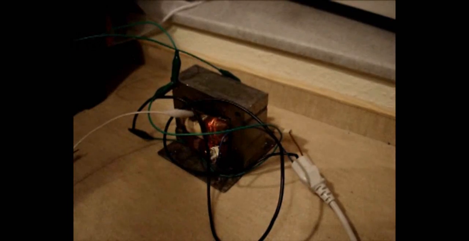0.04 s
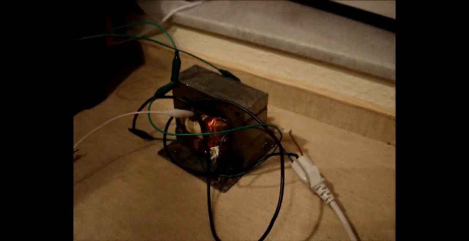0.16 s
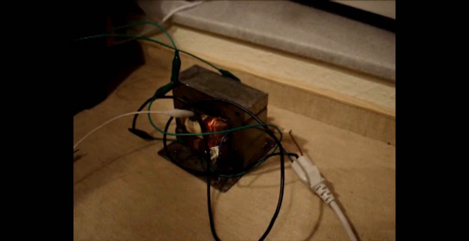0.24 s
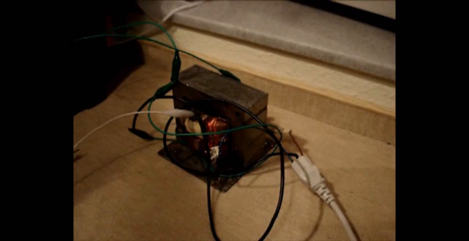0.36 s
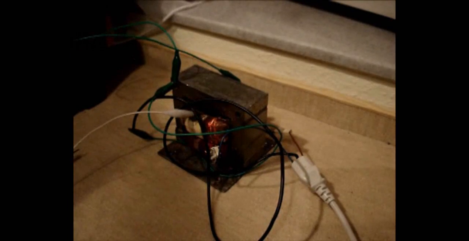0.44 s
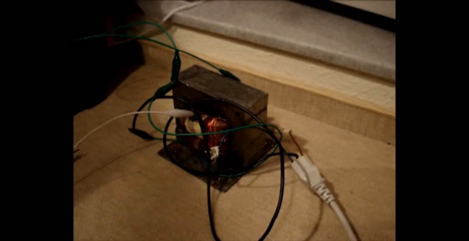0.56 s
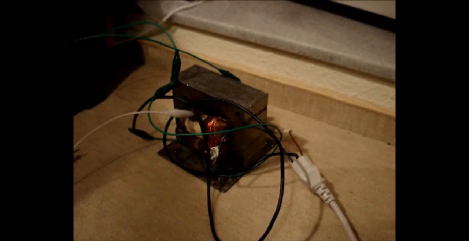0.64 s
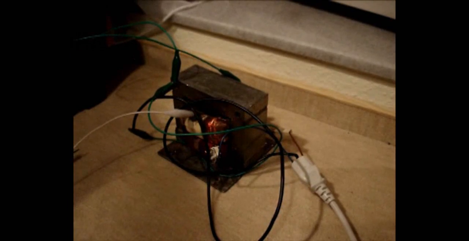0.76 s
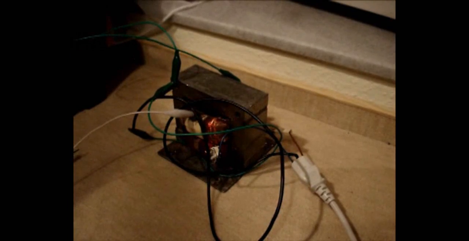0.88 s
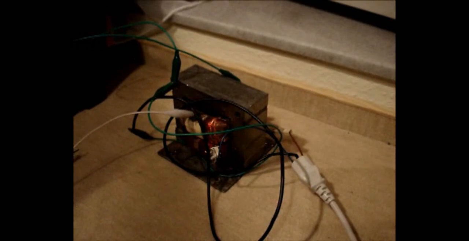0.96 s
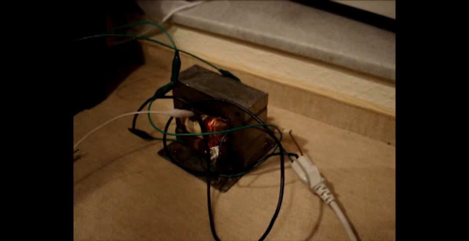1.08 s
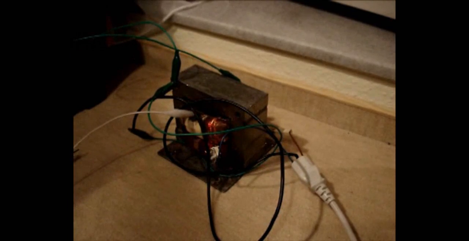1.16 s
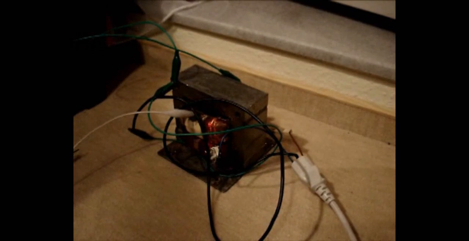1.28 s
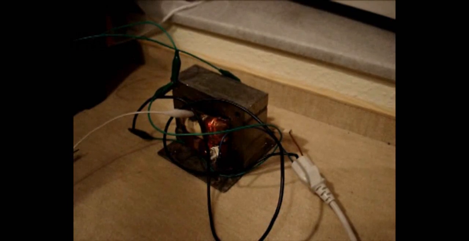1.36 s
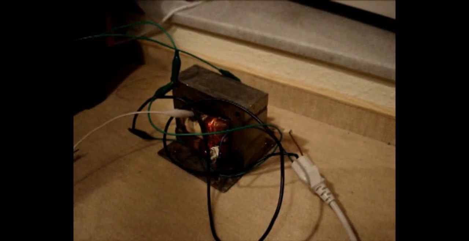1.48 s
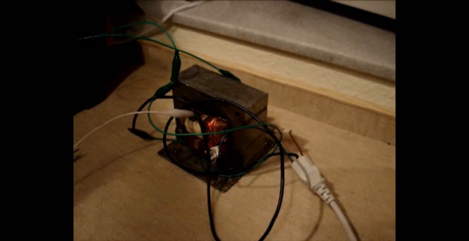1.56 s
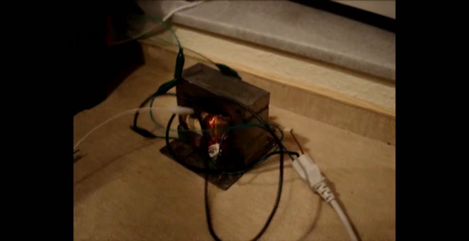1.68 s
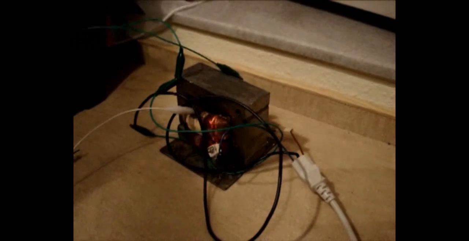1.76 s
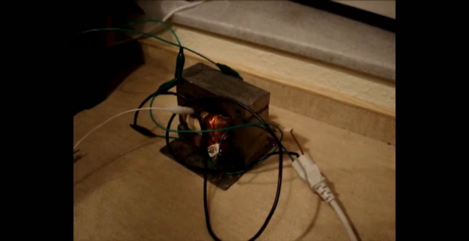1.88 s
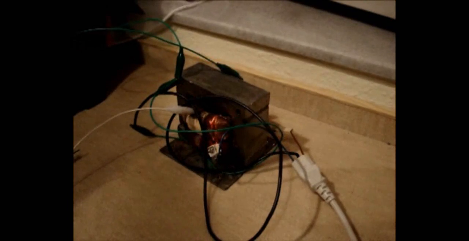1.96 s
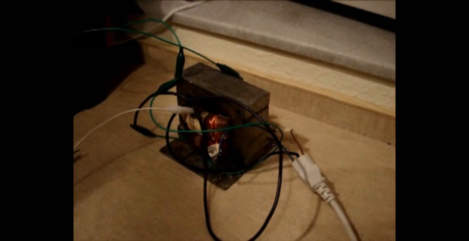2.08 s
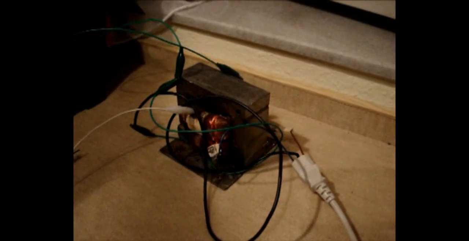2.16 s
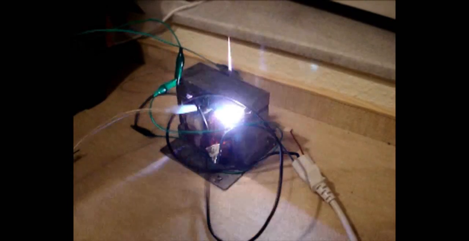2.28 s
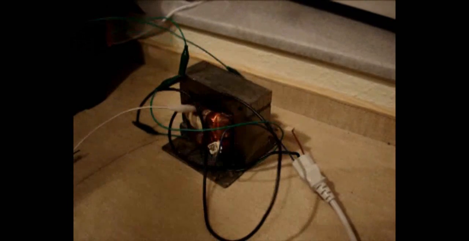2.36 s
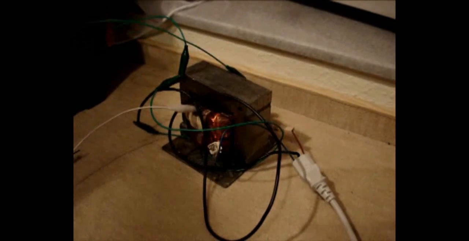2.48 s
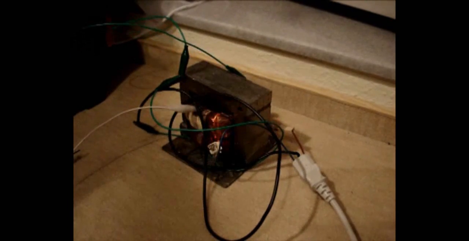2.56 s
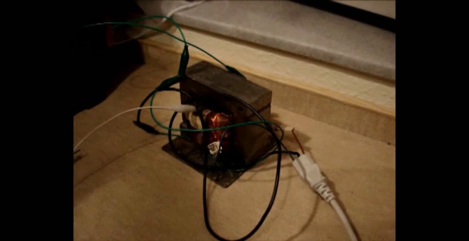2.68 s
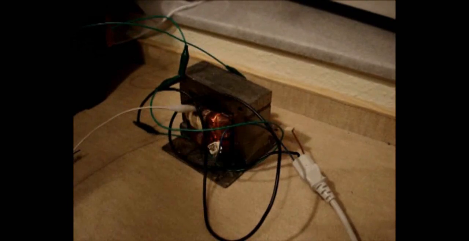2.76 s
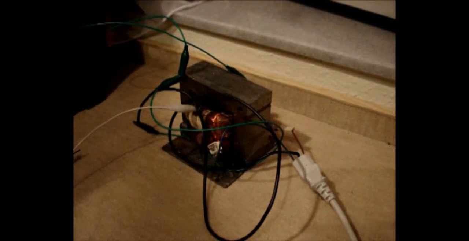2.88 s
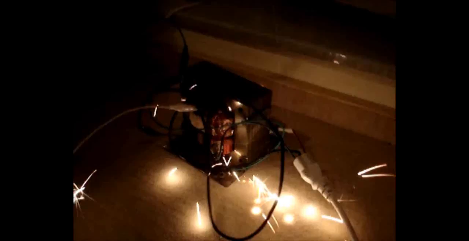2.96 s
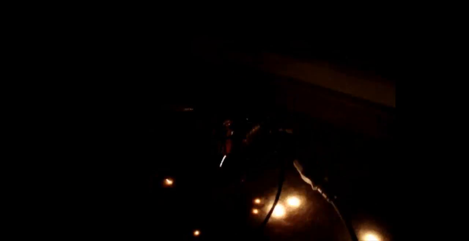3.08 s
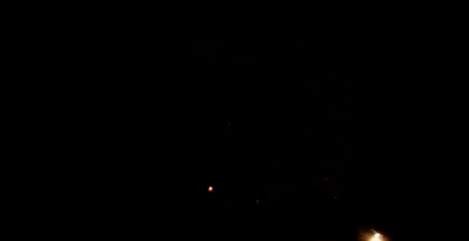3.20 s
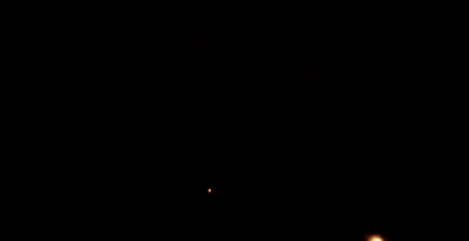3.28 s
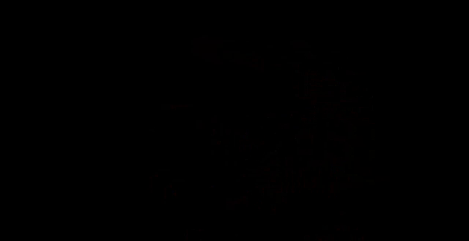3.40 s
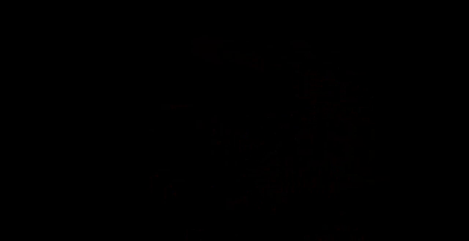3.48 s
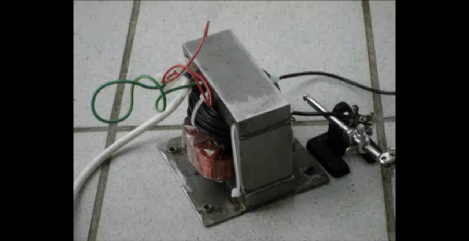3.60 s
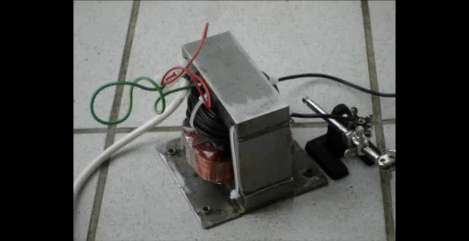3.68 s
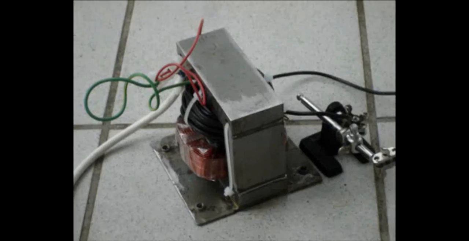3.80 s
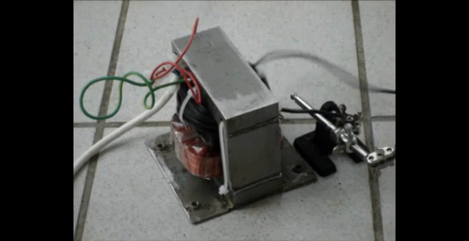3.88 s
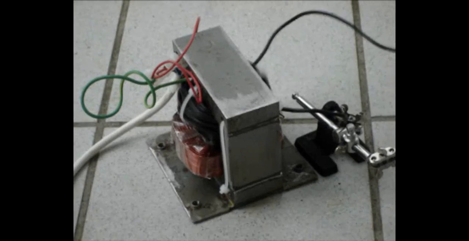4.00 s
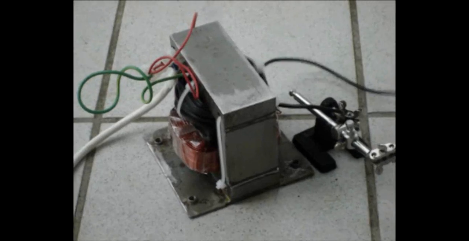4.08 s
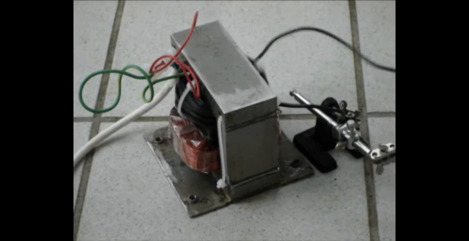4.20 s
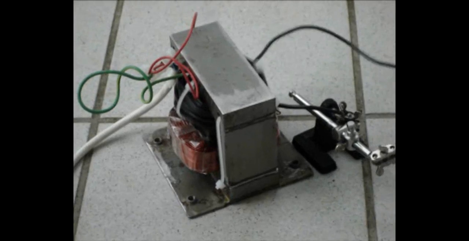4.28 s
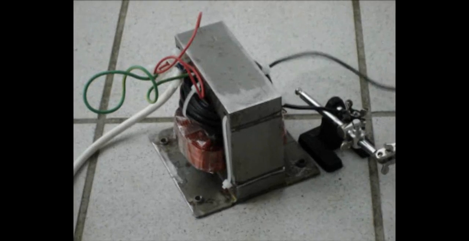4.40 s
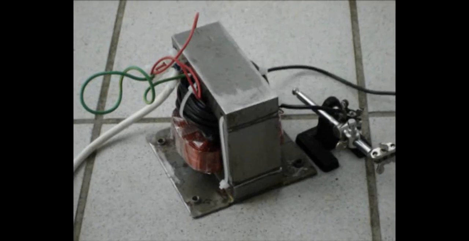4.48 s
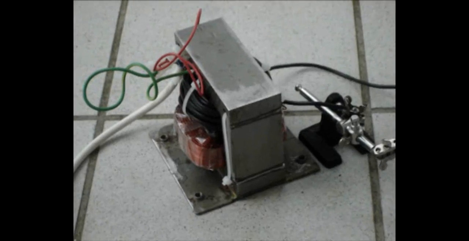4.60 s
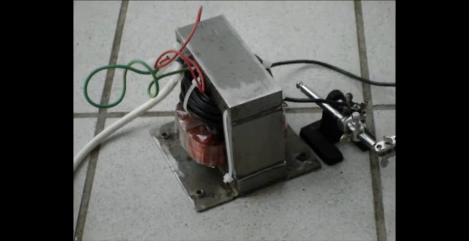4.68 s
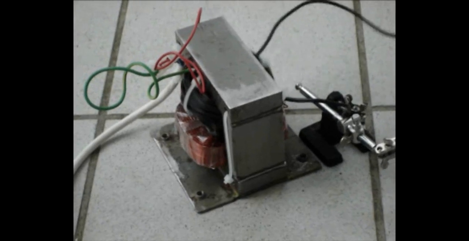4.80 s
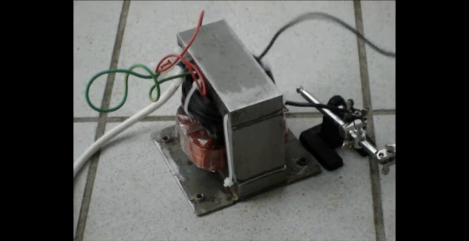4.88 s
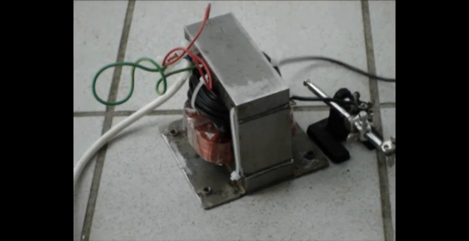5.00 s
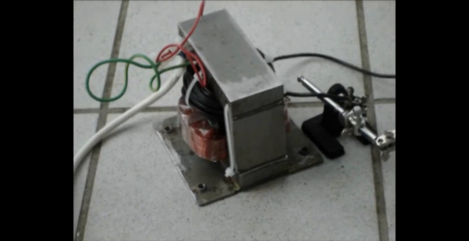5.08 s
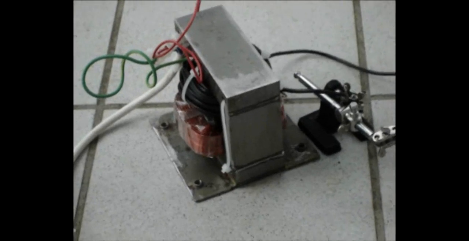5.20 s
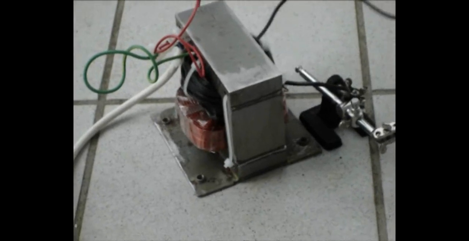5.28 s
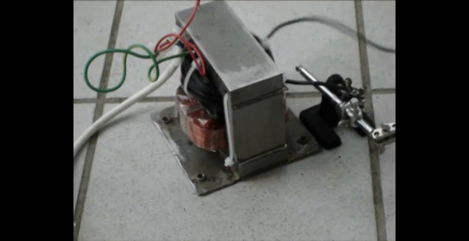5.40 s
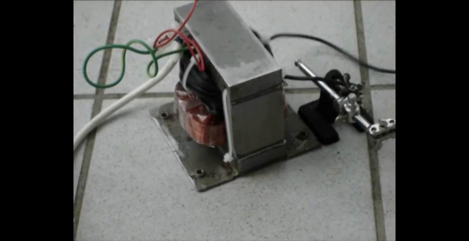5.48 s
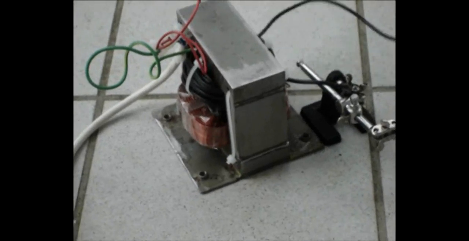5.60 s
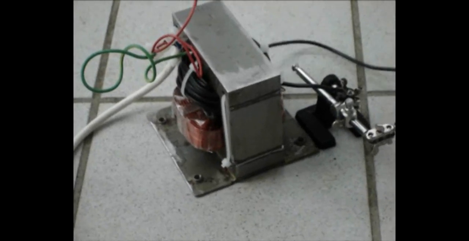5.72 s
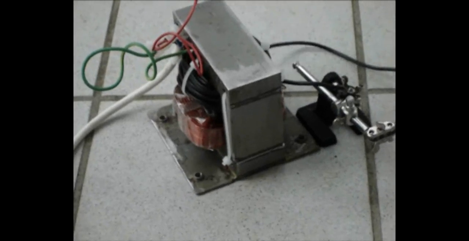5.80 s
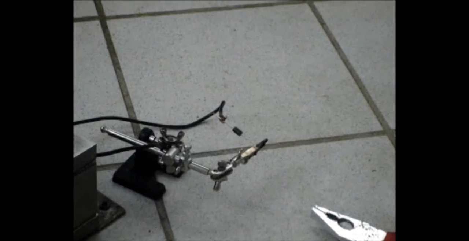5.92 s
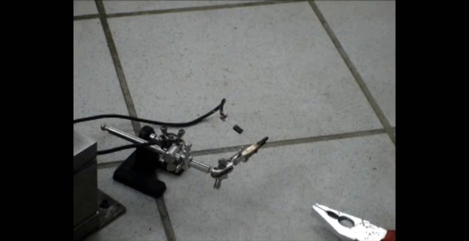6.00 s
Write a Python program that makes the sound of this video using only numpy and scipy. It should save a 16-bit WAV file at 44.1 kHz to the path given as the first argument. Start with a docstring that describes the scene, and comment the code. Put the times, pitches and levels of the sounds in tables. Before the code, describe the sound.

Over faint hiss and a very faint deep drone in a small room, hands fumble a plug from about 0.5 seconds, making irregular ticks, scrapes and hollow knocks with soft cable rustle. At 1.7 seconds a transformer shorts with a loud, clattering bang: rapid cracks, a brief metallic ring, a low thump and gritty spattering sparks. Similar bangs follow at 2.4 and 3.1 seconds, with more fumbling between and after. At 3.7 seconds the sound cuts to a tiled room with a low rumble and one light tap. A close switch clicks on and off three times, and the overloaded iron core buzzes from 4.1 to 4.5, 4.9 to 5.1 and 5.4 to 5.7 seconds. Each buzz rattles and sizzles with a thin wavering tone and a deep hum that lingers briefly. Near 6 seconds, a cut leaves quiet background noise and hiss.

```python
"""A small room, with a rewound mains transformer on the floor. Hands fumble a plug, and three times a short
flashes over: a clattering bang of cracks, ringing housing and molten spatter. Hard cut to a tiled room, where a
switch is closed three times: the overloaded iron core rattles and buzzes at twice the mains rate until the
switch clicks off. Cable rustle sits under the first room, with faint deep tones that glide up and down in
arches; a low murmur sits under the second, hiss under both; a last hard cut leaves low background noise and
hiss."""
import sys
import numpy as np
from scipy import signal
from scipy.fft import rfft, irfft, next_fast_len
from scipy.io import wavfile
from scipy.ndimage import uniform_filter1d

SR = 44100
rng = np.random.default_rng(int(sys.argv[2]) if len(sys.argv) > 2 else 0)


def store_wav(level_fs):
    """Save 16-bit WAV to argv[1]."""
    pcm = np.round(np.clip(np.atleast_2d(level_fs), -1, 1) * 32767)
    wavfile.write(sys.argv[1], SR, pcm.T.astype(np.int16))


N = 266805
T = np.arange(N) / SR

# Hits inside the bangs (time [s], level [dB], low ring send [dB], high ring send [dB])
BLOWS = [(1.727, 7.5, -15, -32), (1.733, 8, -24.5, -17.5), (1.739, -2.5, -2, -32.5), (1.755, 7, -23, -11),
         (1.769, -12, -19, -4.5), (1.798, 14.5, -18.5, -21), (1.817, -12, 7.5, -14), (1.828, -24.5, -17, 0),
         (2.407, 4, -13.5, -11.5), (2.413, -11.5, 1, -23.5), (2.429, 7, -24.5, -22),
         (2.441, 1.5, -6.5, -19), (2.46, -8, -13, -26), (2.498, -8.5, -0.5, -11), (3.056, 12, -18.5, -24),
         (3.069, -3.5, 4.5, -8), (3.077, -7, -30, -3.5)]
# Ring of the housing (pitch [Hz], send [0 low, 1 high], level [dB], t60 [s])
HOUSING_MODES = [(890, 0, -5.5, 0.021), (1040, 0, -9.5, 0.029), (2120, 1, -5, 0.056),
                 (2500, 1, -20.5, 0.074)]
# Arc strikes (time [s], burn [s], arc level [dB], treble re arc [dB], spark level [dB],
# spark fade [dB/s], shaken cable level [dB], thump level [dB])
ARCS = [(1.728, 0.011, -15, -6, -31.5, 223, -47, 2.5), (1.756, 0.021, -24, -3.5, -37.5, 230, -57.5, -0.5),
        (1.798, 0.0046, -34, -21, -30, 221, -53.5, 0.5), (2.405, 0.0019, -15.5, -8, -25, 260, -49.5, 5),
        (2.427, 0.027, -25.5, 0, -27.5, 260, -51, -1.5), (2.495, 0.012, -35.5, -27, -42, 302, -57, -4.5),
        (3.057, 0.021, -20.5, -5.5, -23.5, 183, -58, 1.5)]
# Boom of floor and room (pitch [Hz], level [dB], t60 [s])
THUMP_MODES = [(38.9, -25, 0.022), (68.2, -47, 0.3), (102.6, -40, 0.23)]
# Held notes of the housing (time [s], length [s], HOUSING_MODES row [index, rounded], level [dB])
HOUSING_NOTES = [(1.746, 0.061, 0, -20), (1.757, 0.038, 2, -19.5), (1.7992, 0.0037, 1.5, -5),
                 (1.809, 0.033, 0.5, -18.5), (1.814, 0.029, 3, -23.5), (2.406, .018, 0.5, -5),
                 (2.454, 0.03, 1, -24), (2.462, 0.031, 2, -21.5), (2.5, 0.0074, 0.5, -14.5),
                 (3.062, 0.012, 0, -4.5), (3.075, .05, 0.5, -25)]
# Switch throws (on [s], off [s], on click [dB], off click [dB], rattle level [dB], attack [s])
SWITCHINGS = [(4.0578, 4.542, -15, -13.5, -10, 0.022), (4.8982, 5.11, -12, -10, -12, 0.0083),
              (5.3931, 5.7428, -12.5, -15, -9, 0.027)]
# Swells under load (time [s], rattle boost [dB], sizzle boost [dB], extra sizzle treble [dB])
SURGES = [(4.1, 1.5, 0, 2.5), (4.128, 3.5, 3.5, 9), (4.2, 3, 7.5, 4), (4.34, 1, 2, 4.5),
          (4.398, -2.5, 7, 6), (4.479, -2, 3.5, 2.5), (4.522, -7.5, 4, 6), (4.934, 5, 5.5, 7.5),
          (5.028, -1.5, 3.5, 4), (5.09, 2, 1.5, -3), (5.487, -0.5, 4.5, 7.5), (5.506, 0, -5, -9),
          (5.576, -3, 2, 8.5), (5.599, -5.5, 5, 0), (5.652, -3.5, 4.5, 3.5)]
# Resonances of the iron core (pitch [Hz], width [Hz], level [dB])
CORE_MODES = [(169, 4, -9), (196, 7.8, -11), (293, 6, -19.5), (288.3, 8.8, -8.5), (389, 26, 3),
              (474, 5.6, 3), (527.7, 36, -2.5), (709, 11, -2.5), (740.4, 14.8, -2), (891, 98, -20.5),
              (1022, 78, -9.5), (1203, 22, -7.5), (1286, 98, -13)]
# EQ of the chattering laminations (frequency [Hz], level [dB])
RATTLE_EQ = [(60, -52), (110, -44), (200, -49), (400, -6.5), (600, -2.5), (1000, -6), (1450, -22),
             (2000, -37.5), (3500, -100)]
# EQ of the contact sizzle (frequency [Hz], level [dB])
SIZZLE_EQ = [(760, -11.5), (1300, -14.5), (1480, -14.5), (1700, 1), (1830, -3), (2480, -7), (3290, -5),
             (3810, -12), (4110, -10), (4520, -14.5), (7250, -24.5), (8910, -28), (10100, -49),
             (13200, -79), (22000, -120)]
# Path of the loose plate's tone (time [s], pitch [Hz], level [dB])
PLATE_PATH = [(4.075, 573.5, -9.5), (4.107, 577.1, -1), (4.19, 545.7, -9), (4.238, 567, -6),
              (4.3, 548.7, -4), (4.389, 537, -7), (4.454, 566, -2.5), (4.56, 567.5, -1), (4.919, 534.6, -7),
              (4.994, 543.6, 3.5), (5.015, 541, -15), (5.048, 570, -7), (5.12, 545, -2),
              (5.42, 581.6, -4.5), (5.527, 569, -4.5), (5.6, 555, -8), (5.648, 534, -3), (5.708, 593, -9),
              (5.76, 538.6, -1)]
# Hum partials (pitch [multiple of PULL_HZ], level [dB], t60 in the room [s])
HUM_PARTIALS = [(1, -39.5, 0.43), (1.5, -38.5, 0.97), (2, -25, 0.36), (3, -31.5, 0.41)]
# Ring of the plastic switch (pitch [Hz], level [dB], t60 [s])
CLICK_MODES = [(1335, 1, 0.006), (3120, 6, 0.002), (4860, 5.5, 0.005), (6360, -5.5, 0.0079),
               (7840, -15, 0.015)]
# Plug touches (time [s], level [dB], tick pitch [Hz], knock trim [dB], treble trim [dB], scrape [dB])
TAPS = [(0.549, -47, 1170, 7, -23, -3), (0.994, -23, 1020, -6.5, -32, -5.5),
        (1.182, -59, 1350, 20, -22, -8), (1.21, -16.5, 1490, -14, -32, -5),
        (1.244, -32.5, 1690, -1, -28, -10), (1.303, -48, 1720, 6, -21, -5),
        (1.377, -32.5, 2700, -3, -23, -4), (1.412, -16, 880, -6.5, -27, -0.5),
        (1.428, -21, 1070, -12, -26, -11), (1.651, -33.5, 1050, 5.5, -19, -12),
        (1.684, -18.5, 1750, -5, -7.5, 2), (1.959, -19, 1150, -23, -32, -12.5),
        (2.119, -22, 1730, -17, -7, -12), (2.193, -31.5, 930, -1, -9.5, 1.5), (2.28, -50, 940, 8, -24, -8),
        (2.356, -27.5, 2350, -9, -8, -2), (2.368, -20.5, 1750, -7.5, -10, 2.5),
        (2.626, -33, 1460, -12.5, -2.5, -6.5), (2.742, -36.5, 1400, -13, -5, -8),
        (2.768, -29.5, 1790, -15, -5, -5.5), (2.814, -43.5, 1350, 4, -17, -4),
        (2.881, -31, 1140, -10, -3.5, -3.5), (2.911, -36.5, 1650, -5, -2.5, -0.5),
        (2.999, -19, 1600, -22.5, -13.5, -1.5), (3.021, -30, 1790, -17, -0.5, 0.5),
        (3.238, -31.5, 1940, -37, -6.5, 0.5), (3.449, -39.5, 1710, -31.5, 8, -1.5),
        (3.46, -29, 1720, -5.5, 7, -13), (3.519, -37, 2800, -4, -13.5, -4),
        (3.634, -40.5, 1800, -35, -2, -2.5), (3.839, -20, 2600, -12.5, -8, -12)]
# Ring of the plug's shell (pitch [Hz], level [dB], t60 [s])
SHELL_MODES = [(1076, -7.5, 0.043), (1584, 3, 0.022), (1717, -3.5, 0.078), (2735, -1.5, 0.039),
               (3040, 2.5, 0.022)]
# Hollow knock of the housing (pitch [Hz], level [dB], t60 [s])
KNOCK_MODES = [(357.5, -3, 0.066), (492, -11, 0.084)]
# EQ of the low noise: cable rustle first, plain background at the end (frequency [Hz], level [dB])
LOW_NOISE_EQ = [(59, -31), (100, -8.5), (452, 8.5), (647, 0), (1220, -6.5), (1330, -6.5), (1900, -5.5),
                (3710, -10.5), (6000, -20.5), (7800, -45.5), (13200, -120)]
# Fader ride of the low noise (time [s], level [dB])
LOW_NOISE_RIDE = [(0, -93), (.5, -63), (1, -57.5), (1.6, -53), (2.1, -63.5), (2.35, -54), (2.7, -72),
                  (3, -51), (3.35, -74.5), (3.7, -64), (6.05, -53.5)]
# EQ of the tiled room's murmur (frequency [Hz], level [dB])
MURMUR_EQ = [(45, -31), (65, -8), (80, 10), (100, -5), (230, -3), (420, -4), (730, -5), (1270, -11.5),
             (1900, -14), (4000, -19.5), (8000, -27), (10400, -45)]
# Up-and-down glides of the drone (start [s], length [s], top pitch [Hz])
DRONE_ARCHES = [(-.15, 1.22, 38), (1.45, 1.0, 41), (2.38, 1.25, 40), (3.13, 1.1, 38)]
# EQ of the hiss bed (frequency [Hz], level [dB])
HISS_EQ = [(20, -7.5), (53, -5.5), (90, -1.5), (128, -5), (776, -8.5), (984, -7.5), (1070, -8.5),
           (3220, -14), (3490, -11.5), (10100, -18.5), (13200, -40.5), (22000, -120)]
# Fader ride of the hiss (time [s], level [dB])
HISS_RIDE = [(0, -61), (1.4, -56), (2.7, -60.5), (3.7, -60), (5.9, -56), (6, -57)]

TILED_IN_S, TILED_OUT_S = 3.73, 5.958
PULL_HZ = 99.77  # the core is pulled tight twice per mains cycle
MAKE_S, BREAK_S = 0.0047, 0.016  # lag from click to current on, and to current off
RISE_S = 0.00138  # lag from the cue of a touch or blow to its transient


def flashovers():
    """The bangs: sharp pressure cracks ring the housing, over a low thump and the spatter."""
    s, db, low_db, high_db = np.transpose(BLOWS)
    s = s + RISE_S
    hit = strikes(s, undb(db))
    pressure = hit - np.roll(hit, shift=18)  # a push, then suction
    crack = undb(5) * band(band(pressure, 500, 2400), 300, 7900)
    kick = strikes([row[0] for row in ARCS], undb([row[-1] for row in ARCS]))
    sends = strikes(s, undb(db + low_db)), strikes(s, undb(db + high_db))
    housing = sum(undb(g) * ring(sends[round(k)], hz, t60) for hz, k, g, t60 in HOUSING_MODES)
    return crack + resonate(kick, THUMP_MODES) + housing + spatter()


def spatter():
    """Molten metal: a gritty burst while each arc burns, then a longer tail of falling sparks."""
    grain = rng.standard_normal(N) * undb(3.3 * walk(300))
    body = unit(band(band(grain, 670, 4030), 1200, 4300)) + undb(-12) * unit(band(grain, 220, 1100))
    treble = unit(band(band(grain, 4500, 8500), 4200, 9500))
    out = 0
    for s, burn_s, db, treble_db, sparks_db, fade_db_s, *_ in ARCS:
        arc = fade(s, burn_s, db, fade_db_s=500)
        sparks = fade(s, burn_s, sparks_db, fade_db_s)
        out += (arc + sparks) * body + (undb(treble_db) * arc + undb(-12.5) * sparks) * treble
    return out


def housing_song():
    """The housing sings while the arc drives it: rough tones that swell fast, hold and stop dead."""
    out = np.zeros(N)
    for s, span, row, db in HOUSING_NOTES:
        t, i = T[:int(span * SR)], int(s * SR)
        envelope = undb(db) * np.sin(np.pi * t / span) ** 0.18
        out[i:i + len(t)] += envelope * np.sin(2 * np.pi * HOUSING_MODES[round(row)][0] * t)
    return out * undb(1.8 * walk(250))


def core_buzz():
    """Loose laminations slap unevenly on every magnetic pull and ring the core; sizzle rides on top."""
    count = int(N / SR * PULL_HZ)
    jitter, force = rng.standard_normal((count, 2)).T
    slaps = strikes(np.abs(np.arange(count) + 0.049 * jitter) / PULL_HZ, undb(3.5 * force))
    pull = np.cos(2 * np.pi * PULL_HZ * T)
    envelope = core_load() * undb(1.85 * walk(30))
    grit = rng.standard_normal(N) * (1 + 0.079 * pull)
    chatter = envelope * (0.93 * unit(slaps) + grit)
    iron = sum(undb(db) * unit(ring(chatter, hz, 2.1 / width)) * np.sqrt(width / 30)
               for hz, width, db in CORE_MODES)
    rattle = undb(-23) * unit(iron) + undb(-25.5) * colour(chatter, RATTLE_EQ)
    return band(band(rattle, 115, 6000), 118, 7000) + undb(-21) * contact_sizzle(pull)


def contact_sizzle(pull):
    """A fizz that pulses with the pull while current flows; its top end spits with the surges."""
    fizz = colour(rng.standard_normal(N), SIZZLE_EQ) * (1 + 0.16 * pull) * undb(2.1 * walk(110))
    treble = band(band(fizz, 4400, 10000), 4400, 10000)
    spit = undb(-15.5) * surges(column=3)
    return current() * surges(column=2) * (unit(fizz - treble) + spit * unit(treble))


def current(start_db=-10.5):
    """Gate that passes sound while the switch is closed, building up from a soft start."""
    out = np.zeros(N)
    for on, off, *_, attack_s in SWITCHINGS:
        i, j = int((on + MAKE_S) * SR), int((off + BREAK_S) * SR)
        out[i:j] = undb(start_db * np.clip(1 - T[:j - i] / attack_s, 0, 1))
    return out


def core_load(sag_db_s=4):
    """Envelope of the rattle: it follows the current, surges, and sags under load."""
    on, _, _, _, db, _ = np.transpose(SWITCHINGS)
    throw = np.maximum(np.searchsorted(on, T) - 1, 0)
    return current() * surges(column=1) * undb(db[throw] - sag_db_s * np.maximum(T - on[throw], 0))


def surges(column, width_s=0.014):
    """Gain from one column of SURGES, each entry a short, smooth swell or dip."""
    rows = np.array(SURGES)
    bump = np.exp(-(np.arange(-SR // 20, SR // 20) / SR / width_s) ** 2)
    return undb(signal.fftconvolve(strikes(rows[:, 0], rows[:, column]), bump, "same"))


def loose_plate():
    """A loose plate flutters on a thin tone whose pitch wanders as the core heats and shifts."""
    s, hz, db = np.transpose(PLATE_PATH)
    phase = 2 * np.pi * np.cumsum(np.interp(T, s, hz) + 5.074 * walk(60)) / SR
    flutter = undb(2.5 * walk(40))
    return undb(np.interp(T, s, db)) * uniform_filter1d(core_load(), size=300) * flutter * np.sin(phase)


def hum(attack_s=0.023):
    """The clean pull of the core fills room modes, which boom on after the switch opens."""
    out = 0
    for multiple, db, t60 in HUM_PARTIALS:
        swell = 0
        for on, off, *_ in SWITCHINGS:
            release = undb(-60 * np.maximum(T - off - BREAK_S, 0) / t60)
            swell += np.clip((T - on - MAKE_S) / attack_s, 0, 1) * release
        out += undb(db + 5.1 * walk(33)) * swell * np.sin(2 * np.pi * multiple * PULL_HZ * T)
    return np.sqrt(2) * out


def switch_clicks():
    """Contacts scrape and bounce for a few milliseconds and ring the plastic switch."""
    s, db = np.transpose(SWITCHINGS)[:4].reshape(2, -1)  # on and off clicks together
    age = T[:SR // 30] / 0.0015
    envelope = signal.fftconvolve(strikes(s, undb(db - 7.5)), age ** 2 * np.exp(-1.5 * age))[:N]
    bounce = envelope * rng.standard_normal(N)
    return resonate(bounce, CLICK_MODES) + undb(2) * band(bounce, 720, 6300)


def plug_fumble(tick_t60=0.0059, scrape_t60=0.14):
    """Each touch: a tick with a scraping tail, the shell modes nearest its pitch, then a hollow knock."""
    ticks, t = np.zeros(N), T[:SR // 4]
    for s, db, hz, _, treble_db, scrape_db in TAPS:
        noise = rng.standard_normal(len(t))
        body = unit(band(band(noise, 0.42 * hz, 3.14 * hz), 0.38 * hz, 1.3 * hz))
        treble = undb(treble_db) * unit(band(band(noise, 4800, 8000), 2700, 8000))
        envelope = undb(-60 * t / tick_t60) + undb(scrape_db - 60 * t / scrape_t60)
        i = int((s + RISE_S) * SR)
        ticks[i:i + len(t)] += undb(db - 14) * (body + treble) * envelope
    s, db, tick_hz, knock_db, *_ = np.transpose(TAPS)
    shell = 0
    for hz, mode_db, t60 in SHELL_MODES:
        octaves_off = np.abs(np.log2(hz / tick_hz))
        shell += ring(strikes(s + RISE_S, undb(db + mode_db - 13 - 7.9 * octaves_off)), hz, t60)
    push = uniform_filter1d(strikes(s + 0.0057, undb(db + knock_db)), size=45)  # a soft contact
    return ticks + band(shell, 610, 4800) + band(resonate(push, KNOCK_MODES), 160, 3000)


def low_noise():
    """In the small room, cables moved by hand and jolted by each arc; at the end, plain background."""
    jolts = sum(fade(s, 0, db, fade_db_s=80) for s, *_, db, _ in ARCS)
    return noise_bed(LOW_NOISE_EQ, flicker_db=3, rate_hz=40) * (ride(LOW_NOISE_RIDE) + jolts)


def drone():
    """A faint deep tone and its octave glide in arches, over a sway too deep to have a pitch."""
    hz = np.zeros(N)
    for s, span, top_hz in DRONE_ARCHES:  # each arch takes over from the one before
        hz = np.where(T > s, top_hz * np.sin(np.pi * np.clip((T - s) / span, 0, 1)), hz)
    phase = 2 * np.pi * np.cumsum(hz) / SR
    sway = undb(-52.5) * walk(12) * np.sqrt(np.maximum(hz, 0) / hz.max())
    return undb(-65.5) * np.sqrt(2) * (np.sin(phase) + undb(-5) * np.sin(2 * phase)) + sway


def noise_bed(eq, flicker_db, rate_hz):
    """Coloured noise whose level wanders."""
    return colour(rng.standard_normal(N), eq) * undb(flicker_db * walk(rate_hz))


def room(x, wet_db, low_t60, high_t60, build_s):
    """Direct sound plus a diffuse tail whose treble dies at its own pace."""
    t, noise = T[:SR], rng.standard_normal(SR)
    low = signal.lfilter(*signal.butter(1, 1000, fs=SR), noise)
    tail = low * undb(-60 * t / low_t60) + (noise - low) * undb(-60 * t / high_t60)
    tail *= 1 - np.exp(-t / build_s)
    return x + undb(wet_db) * signal.fftconvolve(x, tail / np.linalg.norm(tail))[:N]


def undb(db):
    return 10 ** (np.asarray(db) / 20)


def unit(x):
    return x / np.sqrt(np.mean(x ** 2))


def band(x, lo_hz, hi_hz):
    return signal.sosfilt(signal.butter(2, [lo_hz, hi_hz], "band", fs=SR, output="sos"), x)


def colour(x, eq):
    """Shape x with an EQ curve, at unit RMS."""
    hz, db = np.transpose(eq)
    size = next_fast_len(len(x))
    bins_hz = np.maximum(np.arange(size // 2 + 1) * SR / size, 1)
    gain = undb(np.interp(np.log(bins_hz), np.log(hz), db))
    return unit(irfft(rfft(x, size) * gain, size)[:len(x)])


def ring(x, hz, t60):
    """One mode; a unit impulse rings with amplitude 1."""
    pole = np.exp(2j * np.pi * hz / SR - np.log(1000) / (max(t60, 1e-3) * SR))
    return signal.lfilter([1], [1, -pole], x).imag


def resonate(x, modes):
    """Play x through a bank of modes."""
    return sum(undb(db) * ring(x, hz, t60) for hz, db, t60 in modes)


def walk(rate_hz):
    """Glides between random levels; spread near 1."""
    step = int(SR / rate_hz)
    return uniform_filter1d(np.repeat(rng.standard_normal(N // step + 1), step), step)[:N]


def strikes(s, gain):
    """Impulses of the given sizes at times s."""
    x = np.zeros(N)
    np.add.at(x, (np.asarray(s) * SR).astype(int), gain)
    return x


def fade(s, hold_s, db, fade_db_s):
    """Envelope that starts at s, holds, then falls at a steady rate."""
    out, i = np.zeros(N), int(s * SR)
    out[i:i + SR] = undb(db - fade_db_s * np.maximum(T[:SR] - hold_s, 0))
    return out


def ride(points):
    """Gain that follows a fader ride."""
    return undb(np.interp(T, *np.transpose(points)))


def scene():
    """Bangs in the small room, hard cut to the buzz in the tiled room, hiss throughout."""
    plug = plug_fumble()
    song, plate = housing_song(), loose_plate()  # narrow tones stir few room modes, so they stay drier
    small = plug + flashovers() + 0.59 * song
    small = room(small, wet_db=-12.5, low_t60=0.31, high_t60=0.13, build_s=0.016)
    small += 0.22 * song + drone()
    clicks = switch_clicks()  # close up, so the room adds little
    tiled = plug * (T > TILED_IN_S) + core_buzz() + 0.73 * plate + undb(-16) * clicks
    tiled = room(tiled, wet_db=-6.5, low_t60=0.35, high_t60=0.25, build_s=0.0058)
    tiled = band(tiled + clicks + 0.31 * plate, 140, 8500) + hum()
    tiled += undb(-48) * noise_bed(MURMUR_EQ, flicker_db=1, rate_hz=14)
    in_tiled = (T >= TILED_IN_S) & (T < TILED_OUT_S)
    low_bed = low_noise() * ~in_tiled
    hiss = noise_bed(HISS_EQ, flicker_db=0.57, rate_hz=21) * ride(HISS_RIDE)
    return (small * (T < TILED_IN_S) + tiled * in_tiled + low_bed + hiss)[None]


def record(dry, ceiling=0.86, top_hz=10200):
    """A soft clip rounds the loudest peaks and a steep low-pass takes off the top."""
    rounded = dry / (1 + np.abs(dry / ceiling) ** 6) ** (1 / 6)
    return signal.sosfilt(signal.ellip(10, 0.2, 70, top_hz, fs=SR, output="sos"), rounded)


dry = scene()
out = record(dry)
store_wav(out)
```